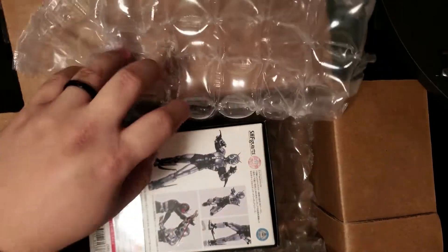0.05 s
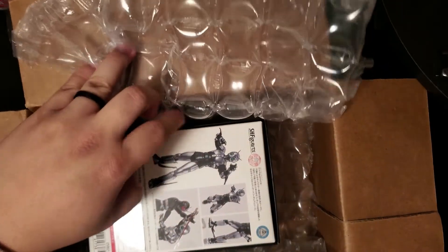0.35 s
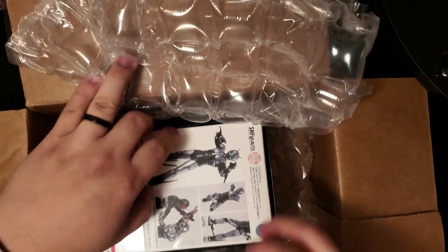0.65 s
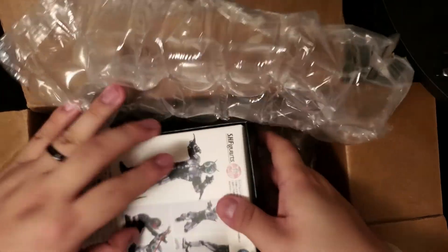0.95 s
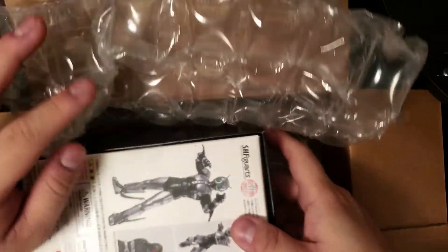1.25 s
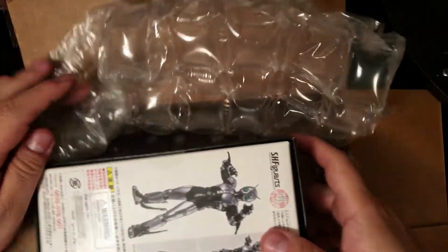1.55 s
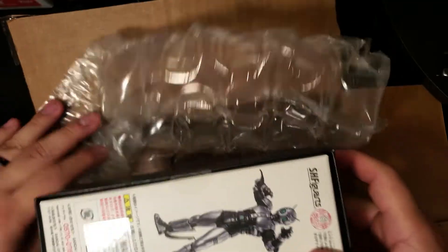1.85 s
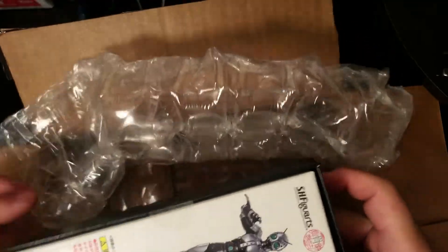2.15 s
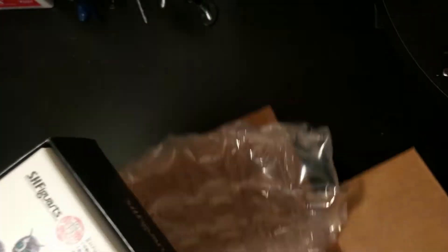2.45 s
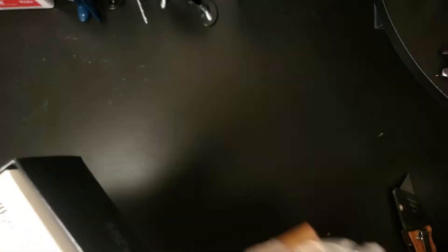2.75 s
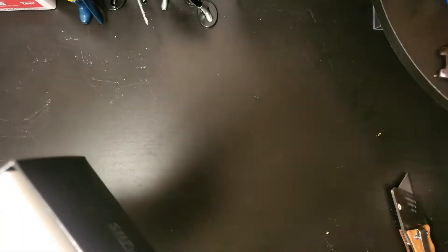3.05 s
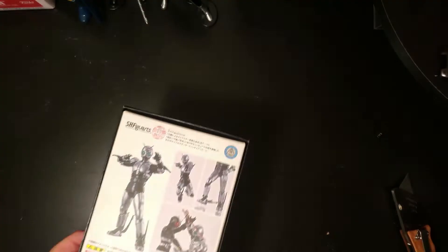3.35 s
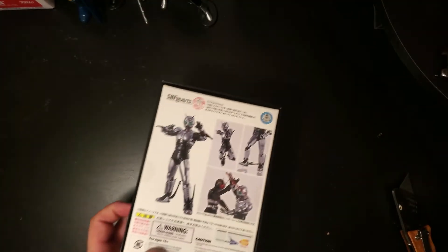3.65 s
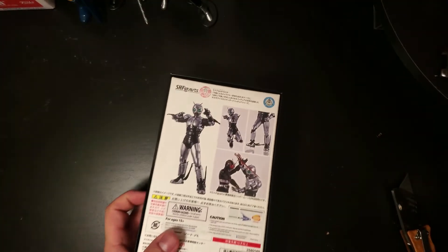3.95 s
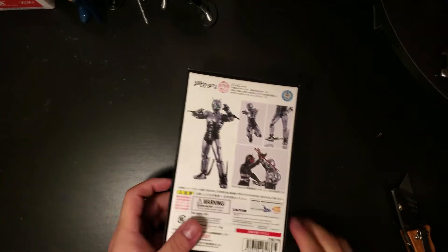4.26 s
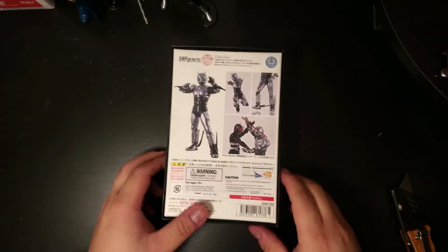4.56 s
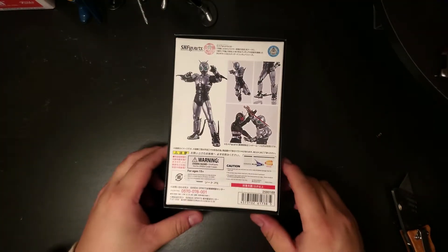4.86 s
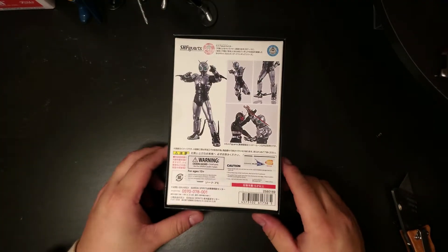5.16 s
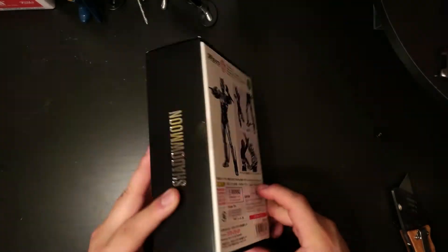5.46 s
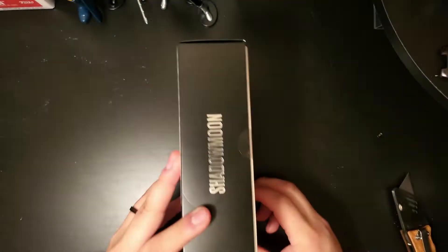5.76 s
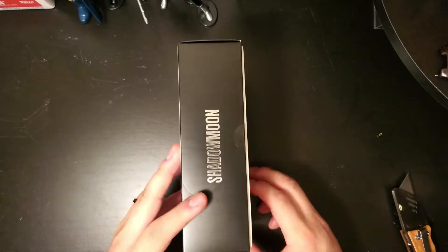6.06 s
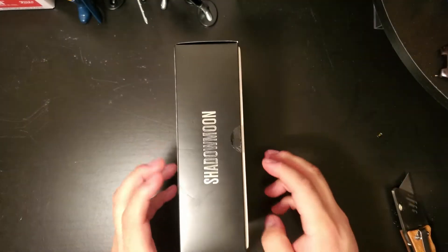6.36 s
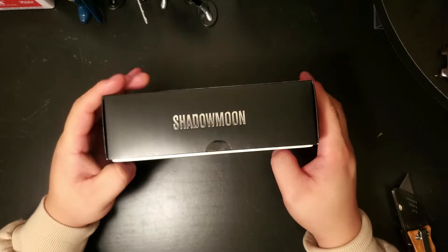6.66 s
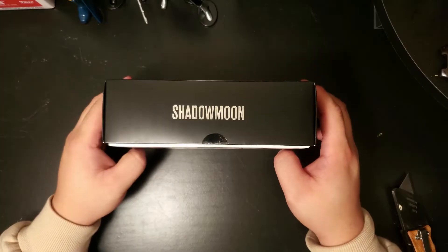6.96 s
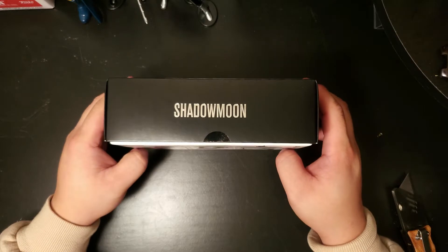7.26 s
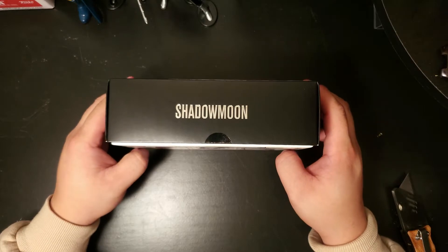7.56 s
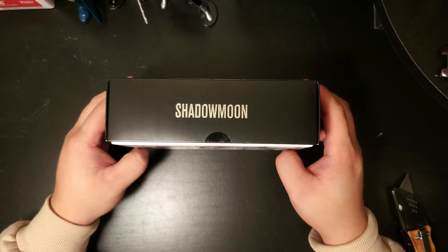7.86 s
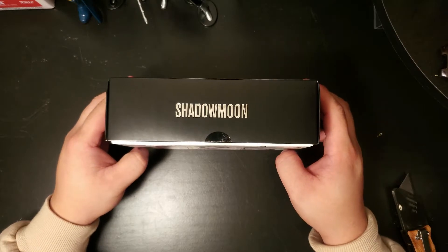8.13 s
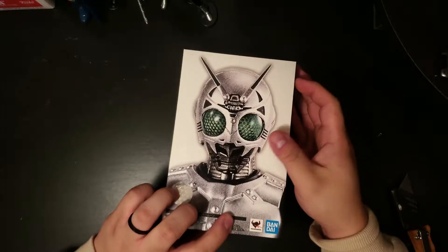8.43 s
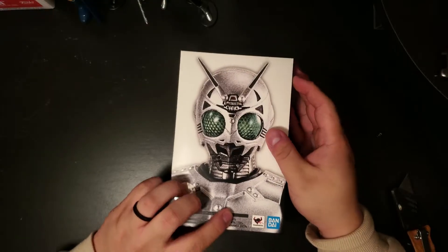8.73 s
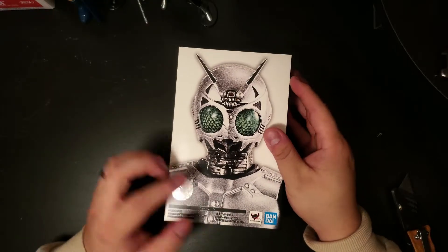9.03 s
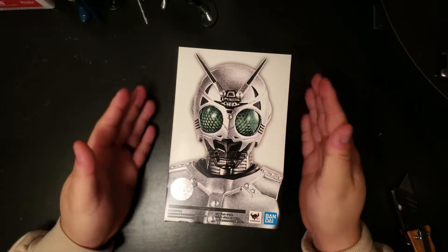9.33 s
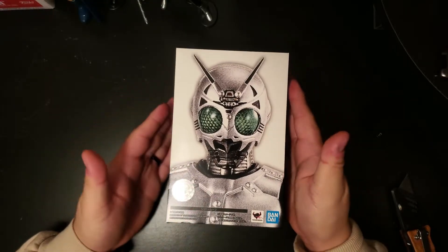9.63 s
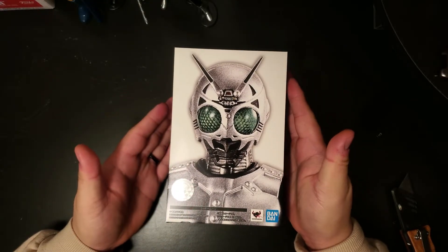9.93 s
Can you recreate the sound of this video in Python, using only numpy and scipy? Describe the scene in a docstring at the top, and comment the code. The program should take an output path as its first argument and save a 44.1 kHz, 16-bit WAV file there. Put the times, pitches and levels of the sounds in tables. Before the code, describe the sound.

Close to the microphone in a small, quiet room, plastic wrap crackles and drags over cardboard while a hollow box scrapes and booms. The crinkling ends with a thump and a last snap. Then comes gentle handling of a small carton: fingers slide and tick on its glossy sides, an edge briefly judders on the desk, and light knocks ring its panels, the loudest as it is laid down near the end.

```python
"""Unpacking a small carton

A carton is worked out of bubble wrap in a shipping box, and the packing is pushed aside. The film
buckles, snaps and drags over cardboard; the hollow box scrapes and booms. The carton is then turned
in the hands, stood on edge and laid on the desk: blows ring its panels, skin swishes and sticks on
the card, an edge judders. Heard close up in a small, quiet room."""
import sys
import numpy as np
from scipy import signal
from scipy.io import wavfile

SR = 44100
rng = np.random.default_rng(int(sys.argv[2]) if len(sys.argv) > 2 else 0)


def wav_record(signal):
    """Record a signal, one row per channel, as 16-bit PCM in the file named by sys.argv[1]."""
    frames = np.transpose(np.atleast_2d(signal))
    bounded = np.clip(frames, -1, 1)
    # unit amplitude maps onto the largest positive 16-bit level
    quanta = np.round(bounded * 32767).astype(np.int16)
    wavfile.write(sys.argv[1], SR, quanta)


N = 440556
TIME = np.arange(N) / SR
BAND_LIMIT_HZ = 16200
LET_GO_S = 2.7  # the packing is released

# Levels are relative. Spectra: f/Hz, level/dB
FILM_SPECTRUM = [(500, -11.5), (1400, 0), (2700, -6.5), (4500, -2), (7500, -1), (11000, -5.5),
                 (16000, -12.5)]
SKIN_SPECTRUM = [(800, -3), (1600, 5), (2600, -2), (4200, -3), (7000, 0), (10500, -4), (13000, -11.5),
                 (16000, -16)]
BOX_SPECTRUM = [(120, -21), (250, -5.5), (380, -0.5), (600, -1), (1000, -3.5), (1700, -7), (2600, -30),
                (5000, -49.5)]
PANEL_SPECTRUM = [(120, -16), (230, 3.5), (400, 6), (520, 0), (660, 1), (1000, -6.5), (1450, -6.5),
                  (2200, -27), (4000, -32)]
PUSH_SPECTRUM = [(12, -42), (25, -15), (40, -9), (62, -3), (110, -10), (150, -7.5), (220, -16.5),
                 (350, -36.5), (700, -56.5)]
BACKGROUND_SPECTRUM = [(10, -43.5), (25, -7.5), (45, -1), (62, 2.5), (90, -7.5), (120, -4.5), (165, -22),
                       (300, -24.5), (500, -34), (900, -36), (3000, -49), (16000, -52.5)]
REVERB_SPECTRUM = [(60, -14.5), (250, -11), (1000, -12.5), (2200, -12.5), (4000, -11), (8000, -10.5),
                   (16000, -16)]
# steady work on the wrap: t/s, crinkle level/dB
WRAP_WORK = [(0.0, -30.5), (0.17, -41.5), (0.38, -36), (0.58, -33.5), (0.66, -33), (0.81, -38.5),
             (0.96, -47.5), (1.07, -46), (1.37, -39.5), (1.56, -41.5), (1.72, -37), (1.84, -37.5),
             (1.97, -36), (2.16, -44.5), (2.4, -42), (2.79, -48.5), (2.88, -56), (3.05, -75)]
# packing catches and gives way: t/s, length/s, crinkle/dB, drag/dB, push/dB
JERKS = [(0.094, 0.11, -28.5, -21, -39), (0.323, 0.1, -44, -40, -37.5), (0.428, 0.11, -26, -17, -34.5),
         (0.486, 0.092, -24, -21.5, -34), (0.529, 0.12, -36.5, -21.5, -31), (0.681, 0.1, -25, -28, -36.5),
         (0.905, 0.036, -52, -41, -57), (1.034, 0.066, -49, -30, -35), (1.528, 0.27, -32, -48, -43),
         (1.772, 0.22, -41, -31, -35.5), (1.94, 0.14, -56, -46, -36.5), (2.073, 0.086, -31, -24.5, -40.5),
         (2.193, 0.064, -55, -55, -32.5), (2.3, 0.11, -55, -29.5, -42.5), (2.385, 0.18, -36.5, -33, -39.5),
         (2.58, 0.022, -27.5, -30, -34), (2.63, 0.4, -34.5, -47.5, -42), (2.722, 0.15, -42, -33, -30),
         (2.8, 0.12, -34, -28.5, -29), (2.859, 0.063, -25.5, -20.5, -20), (2.924, 0.057, -45, -48, -24.5)]
# film's sliding hiss against its crackle: t/s, level/dB
FILM_SLIDING = [(0.75, -8.5), (1.15, -0.5), (2.1, 0.5), (2.3, -5.5), (2.7, 2.5)]
# loudest creases: t/s, level/dB, ring f/Hz, air cell/dB
CREASE_SNAPS = [(0.003, -8, 7100, 1), (0.0307, -17, 8000, 6), (0.0592, -5.5, 7210, 5),
                (0.066, -11, 7500, -2), (0.079, -10, 6000, 3), (0.0856, 0.5, 8900, 9),
                (0.1105, -11, 7000, 3), (0.118, -12, 5000, -4), (0.129, -4.5, 3960, 4),
                (0.166, -9, 6000, 8), (0.182, -17, 7500, -8), (0.194, -8, 8740, -7),
                (0.2162, -13, 11000, -17), (0.2684, -15, 7500, -8), (0.332, -11, 9500, -5.5),
                (0.3452, -21, 7800, -5), (0.3578, -6, 8200, 12.5), (0.3724, -10, 7500, 1),
                (0.391, -3.5, 6910, 6), (0.4, -16, 8000, -2), (0.4038, -16, 7500, 1),
                (0.415, -25, 7500, -10), (0.4249, 2, 7850, -4), (0.4405, -14, 12000, -10),
                (0.4506, -16, 11000, -10), (0.455, -6, 8000, -11), (0.461, -1, 6900, -1),
                (0.4633, -8, 7500, -1.5), (0.496, 3, 6800, -7), (0.501, -13, 10000, -10),
                (0.505, -7, 8950, -8.5), (0.511, -5, 7000, -10), (0.5153, -2, 7000, -1),
                (0.5358, -7, 7810, -1.5), (0.5457, 0, 3870, 5.5), (0.557, -6, 7800, -7),
                (0.596, -5, 6910, 7), (0.642, -14, 8000, -7), (0.6613, -11, 10000, -10),
                (0.688, -3, 7700, -1), (0.703, 0.5, 7500, -1), (0.713, -14, 9000, -6),
                (0.745, -4, 6650, -7), (0.755, -5.5, 7500, 8), (0.7754, -9, 7500, 6),
                (0.788, -5.5, 4200, 2), (0.791, -13, 8000, -5), (0.8106, -18, 9450, 5),
                (0.8365, -7.5, 7300, 11), (0.869, -11.5, 7900, 5), (1.0036, -10, 6450, 3),
                (1.048, -15, 7000, 0), (1.1206, -17, 7500, -6), (1.156, -7, 7500, -5),
                (1.2052, -14, 9000, -8), (1.4465, -15, 8000, -4), (1.475, -14, 8000, -18),
                (1.536, -14, 7000, -8), (1.551, -10, 6000, -16), (1.5653, -7, 9000, -17),
                (1.634, -6.5, 5470, -3), (1.6594, -19, 7000, -6), (1.701, -15, 7960, 10),
                (1.81, -9.5, 5270, -11), (1.901, -8, 9000, 0), (1.926, -13, 7800, -12),
                (1.935, -6, 9380, 2), (1.9639, -6, 4970, -2), (1.982, -15, 8500, 2), (2.007, -11, 8500, 1),
                (2.122, -14, 6000, -5), (2.19, -10, 7740, -11), (2.2397, -13, 6500, -15),
                (2.2876, -14.5, 7000, -11), (2.2993, -9.5, 5960, 1), (2.4535, -5.5, 4670, 8),
                (2.4895, -6, 4660, 9), (2.498, -10.5, 6960, 2), (2.5124, -14.5, 8930, 4),
                (2.535, -13, 7200, 1), (2.5786, -10, 7260, 2), (2.61, -13, 3750, -6), (2.7902, -4, 5670, 0),
                (2.862, 1, 8400, 2), (2.8769, 5, 10000, 7.5), (2.9321, -1, 10750, -5),
                (2.974, -17.5, 10600, -10), (3.024, -20.5, 7960, -5), (3.0629, -15, 7900, 1),
                (3.0723, 2.5, 9100, 7)]
# blows on card: t/s, level/dB, hardness f/Hz, edge nearness/0-1, desk thump/dB, edge tick/dB
BLOWS = [ (0.4361, -9, 1490, 0.7, -30, -27.5), (0.452, -12, 1400, 0.4, -28, -30),
         (0.531, -24, 1500, 0.7, -25, -25), (0.5458, -12, 3900, 0, -9, -27),
         (0.699, -11, 1660, 0.64, -28, -17), (1.065, -17.5, 547, 0.43, -8, -9),
         (1.357, -27.5, 596, 0.6, -14, 2), (2.58, -23, 610, 0.63, -4.5, -4),
         (2.724, -19.5, 520, 0.36, -19, -22), (2.8713, -29, 605, 0.2, 0, -34),
         (3.072, -25.5, 3200, 0.4, -26, -20), (3.353, -33.5, 1520, 0.45, -3.5, 2),
         (3.472, -36.5, 847, 0.9, 10, 1.5), (4.033, -30, 450, 0.8, -18.5, -24.5),
         (4.049, -26, 328, 0.13, -18, -33), (4.267, -42.5, 400, 0.3, 5, -16),
         (4.305, -29, 693, 0.2, -16, -15), (4.336, -16.5, 523, 0.18, -11.5, -30),
         (4.473, -37, 900, 0, -7, -9), (4.5747, -6.5, 754, 0.22, -23, -17),
         (4.6, -31.5, 400, 0.2, 8.5, -20), (4.788, -40, 558, 0.5, -19.5, -14),
         (5.05, -52.5, 800, 0.05, -12, -10), (5.352, -39, 1845, 0, -18, -17.5),
         (5.366, -32.5, 1800, 1, -36, -11), (5.431, -46, 1520, 0.1, -23, -4),
         (5.572, -37, 1100, 0.13, -34, -29), (5.744, -43.5, 463, 0.56, -21.5, -31.5),
         (5.847, -36.5, 563, 0.2, -29, -36.5), (5.963, -18, 365, 0.22, -11.5, -35),
         (6.139, -32, 720, 0.5, 3, -11.5), (6.17, -35, 602, 0.67, 3, -25), (6.476, -23, 1740, 0, -9, -12),
         (6.667, -41, 1460, 0.3, -9, 2), (6.706, -32.5, 503, 0, -25, -16),
         (8.318, -51.5, 1180, 0.5, -9, -17), (8.381, -12.5, 1010, 0.26, -18, -18.5),
         (8.6343, -1.5, 1364, 0.26, -8.5, -23.5), (8.638, -15.5, 595, 0.23, -33, -28),
         (8.659, -30, 810, 0.4, -17.5, -30), (8.814, -37, 1460, 1, -14.5, -7),
         (9.534, -34, 1206, 0, -7.5, -3), (9.963, -59, 900, 0, 2, -14.5)]
# modes: f/Hz, level/dB, t60/s
CARTON_MODES = [(218, -0.5, 0.081), (354, -3, 0.1), (410, -7.5, 0.048), (599, -3, 0.05), (700, -11, 0.039),
                (775, -7.5, 0.06), (859, -5, 0.05), (955, -1.5, 0.035), (1240, -3.5, 0.035),
                (1445, -3.5, 0.022), (1710, -5.5, 0.021), (1960, -8.5, 0.02), (2360, 0, 0.0093),
                (2840, 0.5, 0.012), (3600, 3, 0.011)]
DESK_MODES = [(62, -13.5, 0.27), (105, 1, 0.064), (166, -9, 0.1)]
# scraped shipping box's hollow note: t/s, f/Hz, level/dB
BOX_NOTE = [(0.85, 400, -53), (0.894, 410, -27), (1.04, 400, -35.5), (1.058, 387, -31), (1.214, 417, -30.5),
            (1.322, 430, -46), (1.438, 352, -37), (1.7, 318, -31), (1.808, 417, -30), (1.976, 376, -45),
            (2.011, 344, -28), (2.074, 410, -49), (2.114, 363, -38), (2.142, 332, -45), (2.172, 260, -36),
            (2.266, 300, -53.5), (2.306, 371, -40.5), (2.356, 488.3, -38), (2.408, 367, -45),
            (2.45, 388, -47)]
# bumps on its walls: t/s, level/dB, f/Hz, t60/s
BOX_BUMPS = [(0.921, -21.5, 397, 0.09), (1.063, -19, 159, 0.094), (1.361, -26, 149, 0.057),
             (1.822, -18, 453, 0.073), (2.107, -22.5, 383, 0.069), (2.352, -25, 496, 0.077),
             (2.382, -23, 135, 0.095), (2.723, -21, 147.3, 0.068), (2.8717, -5, 399, 0.05)]
# wrap hissing and rubbing over the hollow box, then (from 3 s) skin and card sliding:
# start/s, end/s, swish/dB, swish f/Hz, rub/dB, panel f/Hz
SLIDES = [ (0.881, 1.12, -52.5, 6270, -37.5, 630), (1.16, 1.328, -46.5, 10800, -38.5, 640),
          (1.52, 1.75, -47.5, 9000, -39.5, 304), (1.78, 1.842, -45, 9000, -37, 574),
          (2.657, 2.88, -44.5, 10000, -37.5, 940), (2.874, 2.9, -40.5, 9840, -25, 410),
          (2.898, 2.922, -42, 9160, -28.5, 930), (3.076, 3.374, -70.5, 5770, -52.5, 860),
          (3.354, 3.389, -52.5, 2900, -52, 626), (3.37, 3.584, -60.5, 4060, -49.5, 1105),
          (3.72, 3.887, -80.5, 5780, -63, 884), (3.909, 3.959, -70, 4780, -71.5, 890),
          (4.04, 4.295, -72.5, 3780, -58.5, 1380), (4.353, 4.368, -53, 2040, -37.5, 404),
          (4.47, 4.504, -53.5, 2620, -53, 400), (4.239, 4.385, -61, 10500, -59, 1370),
          (4.326, 4.573, -53.5, 10300, -49, 1390), (4.54, 4.746, -58, 8300, -52.5, 704),
          (4.985, 5.103, -92, 8800, -61, 370), (5.363, 5.374, -59, 3600, -51, 683),
          (5.453, 5.642, -67.5, 9500, -59, 660), (5.63, 5.72, -64, 8950, -62, 676),
          (5.729, 5.825, -96, 8000, -60.5, 955), (6.016, 6.16, -66, 9140, -50.5, 700),
          (6.173, 6.456, -77.5, 6700, -78, 666), (6.493, 6.555, -62.5, 7400, -49, 666),
          (6.587, 6.595, -55, 6600, -51.5, 695), (6.596, 6.678, -56, 9500, -48.5, 990),
          (6.684, 6.747, -59.5, 8400, -46, 970), (6.803, 6.852, -64, 8600, -57.5, 700),
          (6.858, 6.904, -55.5, 10100, -51, 1096), (6.93, 6.92, -57, 9500, -48, 1383),
          (7.109, 7.473, -94.5, 6990, -66, 562), (8.22, 8.245, -81, 8200, -66, 977),
          (8.312, 8.436, -68, 9200, -52, 950), (8.487, 8.52, -85, 8200, -56, 602),
          (8.613, 8.642, -65.5, 6970, -51.5, 694), (8.634, 8.838, -70, 6650, -58, 1284),
          (8.813, 8.953, -89.5, 7600, -52, 376), (8.983, 9.133, -86, 7650, -63, 1176),
          (9.184, 9.324, -77, 3600, -90.5, 707), (9.424, 9.546, -72.5, 3960, -82.5, 650),
          (9.53, 9.568, -59.5, 4210, -50.5, 645), (9.652, 9.818, -97.5, 6000, -72, 336.5)]
# stiff resonances of the card: f/Hz, width/Hz, level/dB
RASP_MODES = [(1150, 70, 9), (1400, 81, 8), (1550, 80, 3.5), (2550, 110, 2.5), (3400, 210, 6.5),
              (3920, 110, 10), (4230, 120, 6), (6000, 250, 5.5)]
# catches on the gloss: t/s, length/s, level/dB, f/Hz
GLOSS_CHIRPS = [(2.15, 0.09, -63, 4170), (2.367, 0.1, -52, 4440), (2.621, 0.15, -44, 4320),
                (2.9, 0.03, -38, 5020), (3.773, 0.03, -54, 870), (3.774, 0.036, -67, 6200),
                (4.418, 0.094, -55, 1385), (4.788, 0.064, -74, 2890), (5.187, 0.075, -59.5, 896),
                (6.851, 0.094, -53, 1530), (8.2, 0.027, -60.5, 988)]
# fingertip lifts: t/s, level/dB, f/Hz
FINGER_LIFTS = [(4.807, -51, 8800), (4.839, -46.5, 8600), (5.003, -62, 8550), (5.048, -50.5, 8100),
                (6.04, -43, 7500), (6.799, -42, 8500), (7.716, -61, 7500)]
# carton edge slipping on the desk: t/s, level/dB, slip rate/Hz
EDGE_JUDDER = [(5.626, -50, 400), (5.64, -34.5, 225), (5.646, -28.5, 210), (5.658, -28, 306),
               (5.668, -33, 245), (5.676, -50, 280)]
# room decay: f/Hz, t60/s
ROOM_DECAY = [(100, 0.58), (400, 0.24), (1200, 0.23), (2200, 0.29), (4000, 0.24), (9000, 0.17),
              (16000, 0.28)]


def amp(db):
    """Decibels to gain."""
    return 10 ** (np.asarray(db) / 20)


def unit(x):
    """Scales to rms 1."""
    return x / np.sqrt(np.mean(x ** 2) + 1e-20)


def at_hz(points, hz):
    """Table value on a log-frequency axis."""
    f, value = np.transpose(points)
    return np.interp(np.log(hz + 1), np.log(f + 1), value)


def gain_curve(s, db):
    """Gain per sample from a dB curve, silent outside its span."""
    return amp(np.interp(TIME, s, db, left=-np.inf, right=-np.inf))


def add(mix, s, sound):
    """Mixes a sound in at time s."""
    part = mix[max(round(s * SR), 0):][:len(sound)]
    part += sound[:len(part)]


def colour(x, spectrum, size=8192):
    """Minimum-phase filter: clicks keep their attack."""
    log_gain = np.log(amp(at_hz(spectrum, abs(np.fft.fftfreq(size, 1 / SR)))))
    response = np.exp(np.conj(signal.hilbert(log_gain)))
    taps = np.fft.ifft(response).real[:size // 2]
    return signal.oaconvolve(x, taps / np.linalg.norm(taps))[:len(x)]


def resonate(x, hz, width_hz):
    """Two-pole resonance."""
    return signal.lfilter(*signal.iirpeak(min(hz, BAND_LIMIT_HZ), max(hz / width_hz, 1), SR), x)


def glide(x, hz, width_hz, stages=1):
    """Resonances in series that follow the curve hz."""
    turn = np.exp(2j * np.pi * np.cumsum(hz) / SR)
    pole = np.exp(-np.pi * width_hz / SR)
    for _ in range(stages):
        x = 2 * (turn * signal.lfilter([1 - pole], [1, -pole], x / turn)).real
    return x


def noise_band(size, hz, width_hz):
    """Noise through the same resonance twice."""
    return resonate(resonate(rng.standard_normal(size), hz, width_hz), hz, width_hz)


def wander(rate_hz, size=N):
    """Random drift, rms 1."""
    return unit(np.interp(TIME[:size] * rate_hz, np.arange(size), rng.standard_normal(size)))


def slips(rate_hz, spread_db, size=N):
    """Random clicks, many small and a few large, rms 1."""
    height = amp(spread_db * np.minimum(rng.exponential(1, size), 4))
    return unit(height * rng.choice([-1, 1], size) * (rng.random(size) < rate_hz / SR))


def ring(modes, t, weights=1):
    """Decaying modes; neighbours swing in opposite directions."""
    hz, db, t60_s = np.transpose(modes)
    gains = weights * (-1) ** np.arange(len(hz)) * amp(db)
    decay = np.exp(-np.log(1000) * np.outer(1 / t60_s, t))
    return gains @ (np.sin(2 * np.pi * np.outer(hz, t)) * decay)


def rumble():
    """Low noise of a pushed panel, rms 1."""
    return unit(colour(rng.standard_normal(N), PUSH_SPECTRUM))


def effort(size, release_db_per_s=196, jerk_rise_s=0.011, jerk_fall_db=22):
    """Crinkle, drag and push gains: all follow the steady work, and each jerk adds a burst."""
    t = TIME[:size]
    work_db = np.interp(t, *np.transpose(WRAP_WORK)) + 2.5
    drag_db = -19.5 + .39 * work_db
    push_db = -32.5 + .36 * work_db
    release_db = -release_db_per_s * np.maximum(t - LET_GO_S, 0)
    power = amp(np.array([work_db, drag_db, push_db]) + release_db) ** 2
    for s, length_s, *levels_db in JERKS:
        age_s = np.maximum(t - s, 0)
        rise = np.minimum(age_s / jerk_rise_s, 1)
        fall = amp(-jerk_fall_db * np.minimum(age_s / length_s, 4) ** 2)
        power += np.outer(amp(levels_db), rise * fall) ** 2
    return np.sqrt(power) * amp(1.5 * wander(28, size))  # the wrap slides unevenly


def packing():
    """Film facets buckle in clusters, each at its own pitch, as the wrap drags over the pushed box."""
    size = round(WRAP_WORK[-1][0] * SR)
    crinkle_gain, drag_gain, push_gain = effort(size)
    facets = np.zeros(size)
    for hz in np.geomspace(1100, 14500, 14):
        buckles = resonate(slips(100, 3.8, size), hz, .14 * hz)
        facets += buckles * amp(3 * wander(14, size)) / hz ** .3
    crackle = unit(unit(facets) + .8 * slips(300, 3.6, size))
    sliding_db = np.interp(TIME[:size], *np.transpose(FILM_SLIDING))
    sliding = rng.standard_normal(size) * amp(sliding_db + 1.3 * wander(110, size))
    film = amp(-1.8) * unit(colour(crackle + .85 * sliding, FILM_SPECTRUM))
    scrape = slips(1500, 2.5, size) * amp(1.8 * wander(70, size))
    board = amp(-5) * unit(colour(scrape, BOX_SPECTRUM))
    board += amp(-16) * unit(resonate(colour(scrape, PANEL_SPECTRUM), hz=370, width_hz=80))
    push = amp(-2) * rumble()[:size]
    return np.pad(crinkle_gain * film + drag_gain * board + push_gain * push, (0, N - size))


def lesser_snaps(count=42):
    """Random rows like CREASE_SNAPS; levels follow the work on the wrap."""
    s = rng.uniform(0, LET_GO_S, count)
    strength, pitch, cell = rng.standard_normal((count, 3)).T
    db = np.interp(s, *np.transpose(WRAP_WORK)) + 15 + 1.5 * strength
    return list(zip(s, db, 7500 * np.exp(.3 * pitch), 4 * cell - 3))


def snaps(echo_db=-12, flutter_db=-20):
    """A crease flips and sets off smaller ones; the air cell behind answers, the desk reflects."""
    out, t = np.zeros(N), TIME[:1024]
    flutter = amp(flutter_db) * np.exp(-t / .0024)
    for s, db, hz, cell_db in CREASE_SNAPS + lesser_snaps():
        flip = (t == 0) + amp(echo_db) * (t == t[rng.integers(45, 110)])
        drive = flip + flutter * rng.standard_normal(len(t))
        cell = amp(cell_db) * resonate(drive, hz=1600, width_hz=1800)
        snap = resonate(drive, hz, .38 * hz) + amp(-18) * drive + cell
        # all-passes: in the film, treble runs ahead of bass
        snap = signal.lfilter([-.6, 1], [1, -.6], snap)
        snap = signal.lfilter([.45, -.7, 1], [1, -.7, .45], snap)
        add(out, s + .0009, amp(db + 1) * snap / np.linalg.norm(snap))
    return out


def knocks(edge_hz=1200):
    """A blow rings the panels, jolts the tray inside and thumps the desk; soft blows lose the highs."""
    out, t = np.zeros(N), TIME[:SR // 4]
    mode_hz = np.transpose(CARTON_MODES)[0]
    tick_envelope = (1 - np.exp(-t / .001)) * (np.exp(-t / .002) + amp(-22) * np.exp(-t / .012))
    for s, db, hard_hz, edge, thump_db, tick_db in BLOWS:
        rattle, crack = rng.standard_normal((2, len(t)))
        weights = 1 / (1 + (edge * edge_hz / mode_hz) ** 2)  # weak low modes near the stiff edge
        jolt = colour(rattle, PANEL_SPECTRUM) * np.exp(-t / .013) * (1 - np.exp(-t / .0016))
        lowpass = signal.butter(3, 1.1 * hard_hz, fs=SR)
        body = signal.lfilter(*lowpass, ring(CARTON_MODES, t, weights) + .38 * jolt)
        thump = amp(thump_db) * ring(DESK_MODES, t) * (1 - np.exp(-t / .0027))
        tick = amp(tick_db + 2) * colour(crack * tick_envelope, SKIN_SPECTRUM)
        add(out, s, amp(db) * (body / abs(body).max() + thump + tick))
    return out


def desk_rumble(lean_s=0.02, shudder_s=0.04):
    """The desk rumbles as the hands lean into each slide, and shudders after each thump."""
    gain, t = np.zeros(N), TIME[:SR // 2]
    for start_s, end_s, _, _, rub_db, _ in SLIDES:
        lean = signal.windows.cosine(round((end_s - start_s + 2 * lean_s) * SR))
        add(gain, start_s - lean_s, amp(-40.5 + .33 * rub_db) * lean)
    shudder = np.exp(-t / shudder_s) * (1 - np.exp(-t / .002))
    for s, db, _, _, thump_db, _ in BLOWS:
        add(gain, s, amp(db + thump_db - 15.5) * shudder)
    return gain * rumble()


def hollow_box(overtone_ratio=1.48, width_hz=170, bump_rise_s=0.0023):
    """Slips stir the shipping box, whose note moves as the carton leaves; bumps boom its walls."""
    s, hz, db = np.transpose(BOX_NOTE)
    size = round(s[-1] * SR)
    note_hz = np.interp(TIME[:size], s, hz) * (1 + .05 * wander(30, size))
    drive = slips(600, 2.5, size) * amp(2 * wander(60, size))
    note = unit(glide(drive, note_hz, width_hz, stages=2))
    overtone = unit(glide(drive, overtone_ratio * note_hz, width_hz, stages=2))
    out = gain_curve(s, db - 3) * np.pad(unit(note + amp(-9) * overtone), (0, N - size))
    t = TIME[:SR // 2]
    for start_s, bump_db, wall_hz, t60_s in BOX_BUMPS:
        walls = [(wall_hz, bump_db, t60_s), (overtone_ratio * wall_hz, bump_db - 18, t60_s / 2)]
        add(out, start_s, ring(walls, t) * (1 - np.exp(-t / bump_rise_s)))
    return out


def reflect(x, delay_s=0.0005, share=0.3):
    """Echo off a near surface; the changing gap shifts the colour."""
    n = np.arange(len(x))
    lag = delay_s * SR * np.exp(.25 * wander(2, len(x)))
    return x + share * np.interp(n - lag, n, x)


def slides(lead_s=0.022, firm_db=-52.5):
    """Wrap on the box, then skin on card: slips and grit hiss, stir a panel and, when firm, rasp."""
    out = np.zeros(N)
    friction = slips(4500, 2.3) * amp(1.4 * wander(80)) + .3 * slips(120, 2.5)
    grain = colour(friction, SKIN_SPECTRUM)
    card = .7 * grain + sum(amp(db) * resonate(grain, hz, width_hz) for hz, width_hz, db in RASP_MODES)
    hollow = colour(slips(900, 2) * amp(2 * wander(45)), PANEL_SPECTRUM)
    for start_s, end_s, swish_db, swish_hz, rub_db, panel_hz in SLIDES:
        span = slice(round((start_s - lead_s) * SR), round((end_s + lead_s) * SR))
        hiss, body = grain[span], hollow[span]
        grip = 1 + .08 * wander(25, len(hiss))
        rasp = amp(-3.5 + .36 * (swish_db - firm_db)) * unit(card[span])
        contact = unit(glide(hiss, swish_hz * grip, .43 * swish_hz))
        swish = amp(swish_db + 6.5) * unit(reflect(rasp + contact))
        panel = glide(body, panel_hz * grip, .43 * panel_hz, stages=2)
        rub = amp(rub_db + .5) * unit(1.2 * unit(body) + unit(panel))
        speed = signal.windows.cosine(len(hiss)) ** .64
        add(out, start_s - lead_s, speed * (swish + rub))
    return out


def chirps():
    """Fingertip or film sticks and slips on glossy card at a near-steady rate: a fuzzy note."""
    out = np.zeros(N)
    for s, length_s, db, hz in GLOSS_CHIRPS:
        size = round(length_s * SR)
        note = noise_band(size, hz, .18 * hz) * signal.windows.cosine(size)
        add(out, s, amp(db) * unit(note))
    return out


def finger_ticks(rise_s=0.0008, fall_s=0.0021):
    """Skin peels off the gloss with a soft, high tick."""
    out, t = np.zeros(N), TIME[:1024]
    envelope = (1 - np.exp(-t / rise_s)) * np.exp(-t / fall_s)
    for s, db, hz in FINGER_LIFTS:
        add(out, s, amp(db) * unit(noise_band(len(t), hz, .4 * hz)) * envelope)
    return out


def edge_squeak():
    """The carton's edge judders over the desk; uneven stick-slip pulses drive two panels."""
    s, db, hz = np.transpose(EDGE_JUDDER)
    slip_hz = np.interp(TIME, s, hz) * (1 + .2 * wander(400))
    slip_count = np.floor(np.cumsum(slip_hz) / SR)
    pulses = colour(np.diff(slip_count, prepend=0), PANEL_SPECTRUM)
    panels = resonate(pulses, 600, 70) + amp(-16) * resonate(pulses, 324, 200)
    return unit(panels + amp(-21.5) * pulses) * gain_curve(s, db)


def room(x, echoes_per_s=4000, onset_s=0.0079):
    """Dense reflections off near walls, each band decaying at its own rate."""
    taps = rng.choice([-1., 1.], SR) * (rng.random(SR) < echoes_per_s / SR)
    hz, t, bands = signal.stft(taps, SR, nperseg=256)
    decay = np.exp(-np.log(1000) * t / at_hz(ROOM_DECAY, hz)[:, None])
    band_gain = amp(at_hz(REVERB_SPECTRUM, hz))[:, None] / 7.45
    tail = signal.istft(bands * decay * band_gain, SR, nperseg=256)[1]
    tail *= np.clip(TIME[:len(tail)] / onset_s - .5, 0, 1)
    return signal.fftconvolve(x, tail)[:N]


def scene(background_db=-59):
    """The handling in its room, over a low steady rumble; mono."""
    near = packing() + hollow_box() + snaps()
    near += slides() + desk_rumble() + knocks() + edge_squeak() + chirps() + finger_ticks()
    background = amp(background_db) * unit(colour(rng.standard_normal(N), BACKGROUND_SPECTRUM))
    return (near + room(near) + background)[None]


def record(dry):
    """Full-scale limit, then band limit."""
    lowpass = signal.firwin(511, BAND_LIMIT_HZ, window=("kaiser", 9), fs=SR)
    return signal.oaconvolve(np.clip(dry, -1, 1), lowpass[None], "same")


dry = scene()
out = record(dry)
wav_record(out)
```